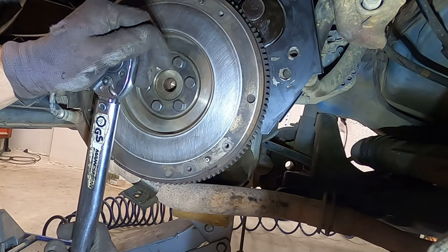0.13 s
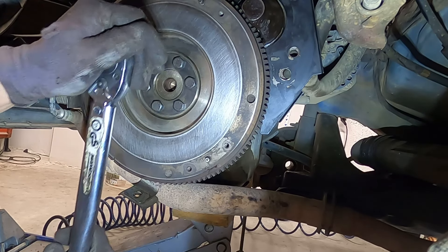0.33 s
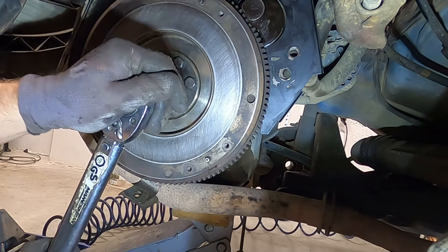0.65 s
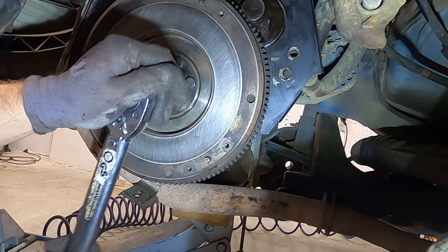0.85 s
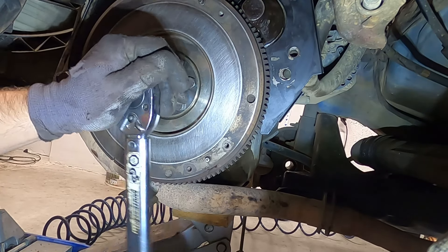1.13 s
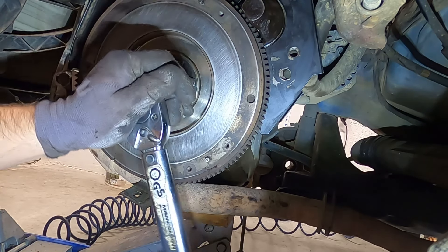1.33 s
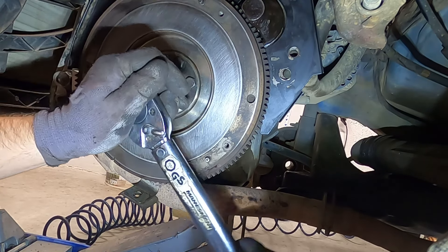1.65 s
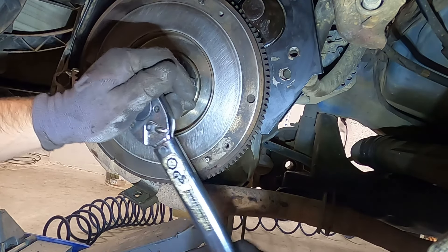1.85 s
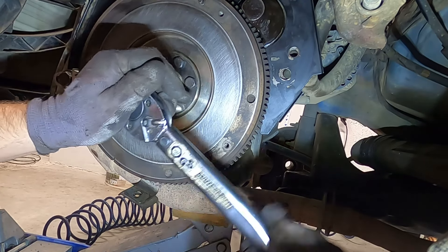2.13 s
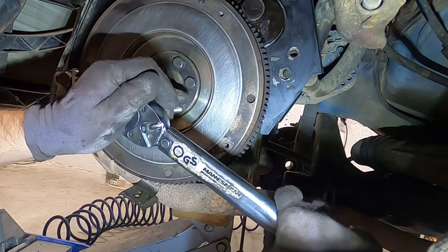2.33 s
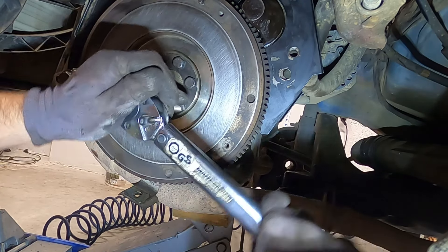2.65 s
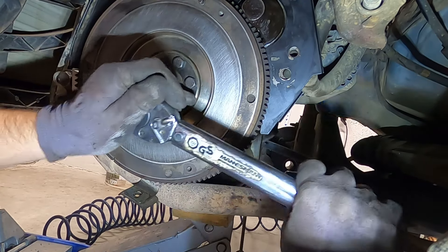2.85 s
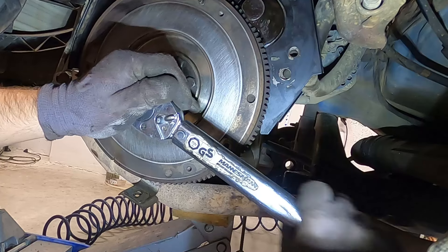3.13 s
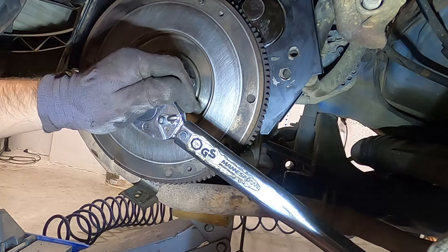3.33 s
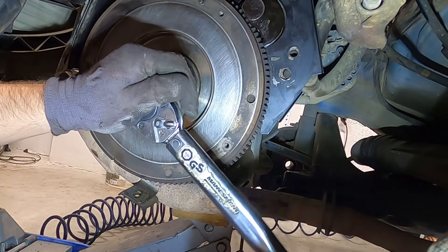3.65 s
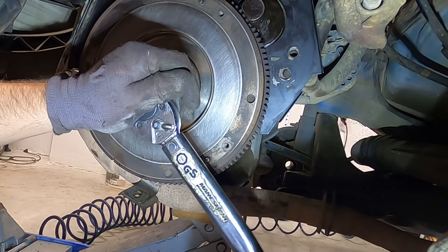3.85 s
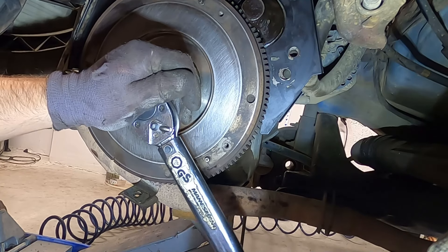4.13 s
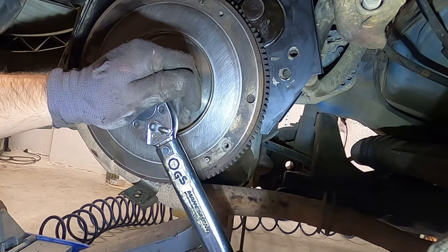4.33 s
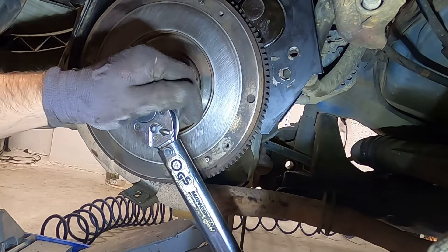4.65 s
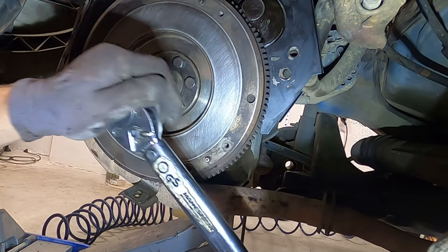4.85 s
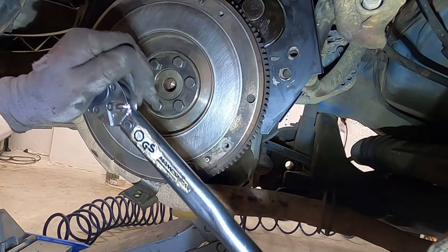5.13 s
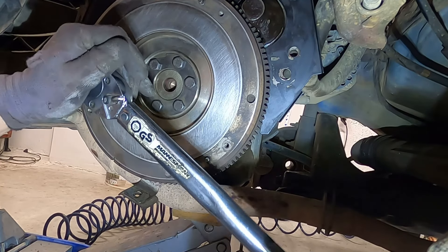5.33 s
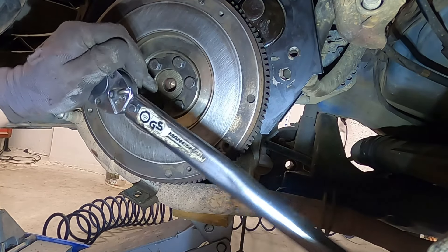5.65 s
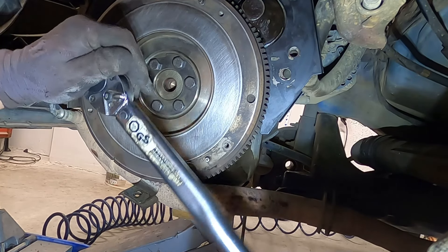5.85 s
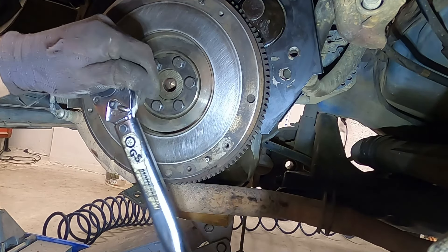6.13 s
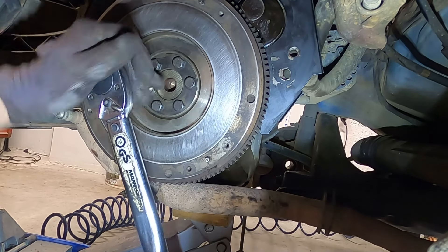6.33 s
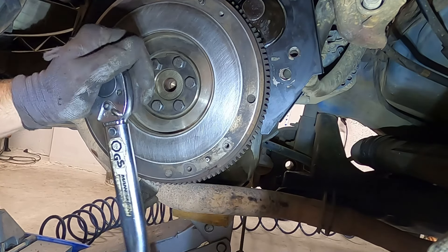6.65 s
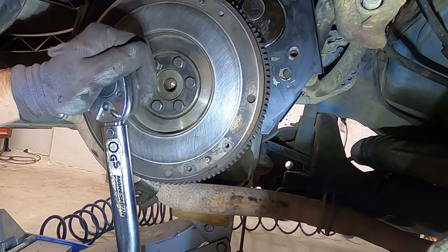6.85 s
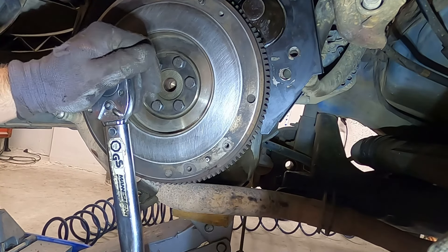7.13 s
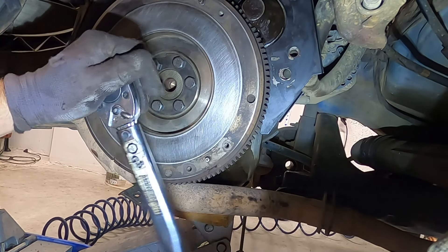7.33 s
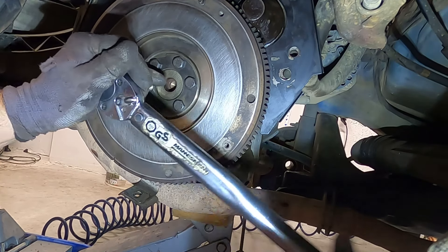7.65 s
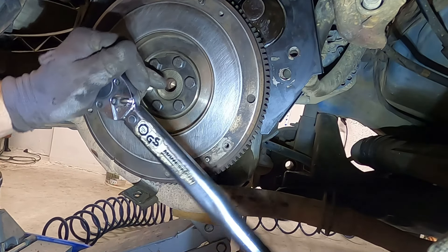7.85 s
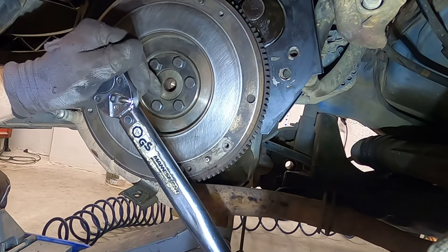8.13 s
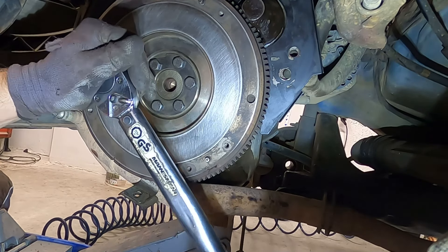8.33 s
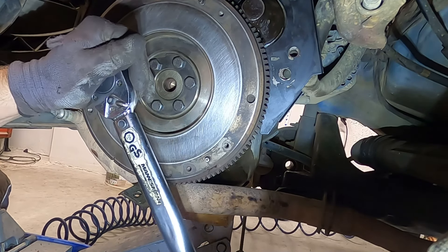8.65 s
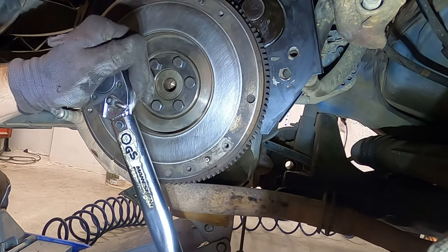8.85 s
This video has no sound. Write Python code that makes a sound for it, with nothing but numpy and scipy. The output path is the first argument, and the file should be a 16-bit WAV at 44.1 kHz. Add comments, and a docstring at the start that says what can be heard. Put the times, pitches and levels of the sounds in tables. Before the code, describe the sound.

Irregular metallic clinks on a flywheel, a single loud, deep wrench knock ringing through the engine, scattered sharp ratchet clicks and sleeve swishes in a quiet workshop.

```python
"""A garage, where flywheel bolts are tightened with a click-type torque wrench under a car.
Sockets clink, the wrench breaks over once with a heavy knock that rings through the engine, and its ratchet snaps
as it is swung back: each is a burst of filtered noise with decaying sines, sent through a diffuse noise echo.
Work clothes swish and a glove scuffs as streams of tiny clicks; squeaks are narrow-band noise, hand bumps dull
noise bursts, and the nudged camera mount and the quiet background are shaped noise."""
import sys
import numpy as np
from scipy import signal
from scipy.fft import rfft, irfft
from scipy.io import wavfile
from scipy.ndimage import uniform_filter1d

SR = 44100
rng = np.random.default_rng(int(sys.argv[2]) if len(sys.argv) > 2 else 0)


def waveform_to_disk(signal):
    """Save audio, clipped to [-1, 1], as 16-bit WAV at the path in sys.argv[1]."""
    frames = np.transpose(np.atleast_2d(signal))
    scaled = np.clip(frames, -1, 1) * 32767
    samples = np.round(scaled).astype(np.int16)
    wavfile.write(sys.argv[1], SR, samples)


N = 396900  # 9 s

# Low, quiet noise of the garage. Each row: frequency in Hz, relative density in dB.
BACKGROUND_COLOUR = [(30, -13.5), (90, -12.5), (170, 1), (350, -1.5), (600, -14.5), (900, -18.5),
                     (1700, -18), (4000, -19), (8000, -32.5), (15000, -30.5)]
# Slow wavering of that noise. Each row: time in seconds, level offset in dB.
BACKGROUND_SWELL = [(0, 10), (0.3, 4), (0.47, -3), (1.0, 4.5), (2.7, 4.5), (3.7, 6.5), (4.03, -6), (5.1, 9),
                    (6.0, -1.5), (7.3, 6.5), (8.3, 2), (9, -6.5)]
BACKGROUND_DB = -69.5  # rms level where the offset is 0 dB

# Jolts of the camera mount. Each row: start in seconds, level in dB before the layer's trim.
JOLTS = [(-0.06, -60), (2.91, -42), (4.39, -47.5), (4.73, -43.5), (6.36, -59), (6.95, -64), (8.18, -41),
         (8.37, -57.5)]
# Deep colour of the shaking mount. Each row: frequency in Hz, relative density in dB.
RUMBLE_COLOUR = [(20, 1.5), (45, -2), (80, -9), (160, -25.5), (500, -54.5)]
JOLT_ATTACK_S, JOLT_HOLD_S, JOLT_DECAY_DB_PER_S = 0.028, 0.036, 108

# Sleeve strokes over the work clothes, one for each move of the arm.
# Each row: fastest moment in seconds, level in dB before the layer's trim, swell in seconds, fade in seconds.
SWISH_STROKES = [(0.0, -67, .05, 0.29), (0.6, -68, 0.17, .17), (1.28, -46.5, 0.14, 0.23),
                 (1.85, -61, 0.51, 0.2), (2.4, -71, 0.34, 0.17), (2.85, -70, 0.29, .5),
                 (3.49, -52.5, 0.098, 0.092), (3.78, -51, 0.12, 0.15), (4.22, -63.5, 0.2, 0.93),
                 (5.07, -52.5, 0.17, 0.41), (5.5, -62, 0.31, 0.84), (6.03, -52, 0.074, 0.067),
                 (6.43, -50.5, 0.4, 0.13), (6.85, -42, .15, 0.12), (7.3, -45, 0.12, 0.19),
                 (7.55, -45.5, 0.091, 0.15), (7.77, -51.5, .12, 0.2), (7.92, -45, 0.055, 0.033),
                 (8.08, -51.5, 0.12, 0.33), (8.78, -61, 0.27, 0.73)]
# Bright hiss of the cloth. Each row: frequency in Hz, relative density in dB.
SWISH_COLOUR = [(200, -25.5), (400, -7), (750, -11.5), (1200, -5.5), (2000, 2), (2600, -1.5), (3700, 2),
                (5300, -6), (7000, -19), (9000, -24.5), (13500, -20.5), (15500, -33.5)]
# Glove strokes over the wrench head.
# Each row: fastest moment in seconds, level in dB before the layer's trim, swell in seconds, fade in seconds.
SCUFF_STROKES = [(0.0, -59, .05, 0.084), (1.34, -59, 0.03, 0.27), (3.36, -63.5, 0.24, 0.12),
                 (6.9, -40.5, .08, 0.062), (7.32, -50.5, 0.18, 0.14), (7.93, -56.5, 0.024, 0.05),
                 (8.19, -53.5, 0.06, 0.089)]
# Duller grain of the glove. Each row: frequency in Hz, relative density in dB.
SCUFF_COLOUR = [(150, -23), (430, -2), (650, -6), (900, -0.5), (1300, -8.5), (1800, 2), (2600, -12),
                (5000, -35.5)]
STROKE_DROP_DB = 10.5  # fall of a stroke over one swell or fade time

# Brief, thin squeaks. Each row: start in seconds, peak level in dB, frequency in Hz, slip length in seconds.
SQUEAKS = [(0.444, -42, 1860, 0.052), (4.831, -33, 1130, 0.014), (6.13, -38.5, 1140, 0.0056),
           (7.482, -28.5, 3050, 0.01), (8.161, -34, 1210, 0.013)]

# The socket strikes bolt heads and flywheel.
# Each row: start in seconds, strength in dB, bass in dB, brightness in dB, ring of the body in dB (all relative).
CLINKS = [(0.892, 12.5, -3.5, -11, -2.5), (1.015, 8.5, -15, -14.5, 4), (1.044, 8, 3, -12, -2),
          (1.115, 5, -1, -6.5, -13), (1.288, -23.5, 21, -7, 15.5), (1.433, 3.5, -6, -2, -3),
          (1.449, 8, -10, -1, -23), (1.467, 14.5, -4, -3.5, -16), (1.487, 17.5, -7, 1, -13.5),
          (1.494, 12, 10, -1, -7.5), (1.55, -6, 23.5, -13, 3), (1.689, -5.5, 6.5, -9, -2),
          (1.734, 13.5, 6, 3, -13), (1.745, 7, 11, -12, 1), (1.777, 19.5, -5.5, 1.5, -16),
          (1.784, 16.5, 4, 1, -19.5), (2.018, -10, 1, -6.5, -6), (2.124, -11, 16, -12, -5),
          (2.604, -7.5, 4, -1, -6), (4.958, -2, -27, -4.5, -13), (5.309, 13.5, -3, -10, -1.5),
          (5.376, -7.5, 14, -10, 4.5), (5.428, 8.5, 3, -21, 3), (5.482, 13.5, -7.5, -2.5, -12),
          (5.767, -7.5, -10, -8, -27), (6.205, 20, -6.5, 0.5, -2.5), (6.68, -8.5, -24, 3.5, -17),
          (8.089, -0.5, 2, -16, -11), (8.142, -4, -7, -12, -10), (8.204, -0.5, 12, 3, -3.5)]
# Colour of the socket's contact. Each row: frequency in Hz, relative level in dB.
CLINK_COLOUR = [(30, -50), (120, -34), (250, -22.5), (520, -8.5), (800, -7.5), (1200, -1), (1700, -1.5),
                (2150, 2), (2650, -8.5), (3300, -0.5), (4200, -9.5), (5300, -14.5), (7000, -33.5),
                (15000, -39)]
# Ringing parts of the flywheel. Each row: frequency in Hz, relative level in dB, T60 in seconds.
FLYWHEEL_MODES = [(174, -18.5, 0.51), (433.5, -10.5, 0.2), (488, -4, 0.37), (577.5, -1, 0.32),
                  (592, -7, 0.37), (1007, -7.5, 0.19), (1184, -1.5, 0.15), (1570, -3, 0.16),
                  (1602, 8, 0.17), (1776, 4.5, 0.12), (1890, 5, 0.22), (2350, -6.5, 0.17), (3400, -7, .18),
                  (3340, -2.5, 0.22), (3450, -8, 0.2), (3940, -15.5, 0.45), (5360, -3, 0.133)]
# The loose socket ticks while it is worked onto a bolt.
# Each row: the two limits of a fumble in seconds, in either order.
FUMBLES = [(1.031, 1.9), (1.42, 1.7), (1.9, 2.52), (2.55, 2.66), (5.329, 4.9)]
TICK_DB, TICK_SPREAD_DB = -19, 3  # strength and its random scatter
TICK_BASS_DB, TICK_BRIGHT_DB, TICK_RING_DB = 5, -9, -6  # dull, light touches
SHARPNESS_DB = -1  # sharpness relative to brightness
CONTACT_T60_S = 0.024  # at 0 dB strength and brightness
CONTACT_DOUBLES_DB, CONTACT_HALVES_DB = 26, 25  # strength that doubles it, brightness that halves it

# The wrench's release slips, breaks over and rebounds. Each row: start in seconds, strength in dB, bass in dB,
# brightness in dB, sharpness in dB, T60 of the contact in seconds, ring of the body in dB (levels relative).
KNOCK = [(2.901, 1.9, -15.5, 7, 2, 0.077, -5.5), (2.912, 11, -8.5, 5.5, 5, 0.081, -7),
         (2.923, 13.6, -8, 7, 3.5, 0.02, -7.5), (2.929, 20, -1, -3, -5, 0.057, 6),
         (2.939, 13, -3, -1, 1.5, 0.021, -4), (2.945, 18, -1.5, -13.5, -11.5, 0.035, -1.5),
         (2.98, 8.7, -2, -19, -5, 0.042, -5.5), (2.996, 10, 1, -40, -4.5, 0.16, -3),
         (3.048, 6.3, -4, -8, -8, 0.37, -10)]
# Colour of the release's contact. Each row: frequency in Hz, relative level in dB.
KNOCK_COLOUR = [(50, -2.5), (100, 4.5), (350, 1), (680, -8), (1050, 1), (1400, -0.5), (1850, 6),
                (2500, -6.5), (3200, 7), (3850, 0), (4400, -15), (6200, -23), (8000, -37), (15000, -33)]
# Ringing parts of the engine. Each row: frequency in Hz, relative level in dB, T60 in seconds.
ENGINE_MODES = [(80, -18.5, 1), (85, -14, 0.87), (102, -21.5, 0.63), (167, -25, 0.4), (217, -25.5, .35),
                (291, -17, 0.29), (384, -19, 0.27), (460, -22, 0.14), (515, -22, 0.32), (892, -21, .35),
                (1077, -20, 0.19), (1172, -28.5, .35), (1470, -32.5, 0.44), (1517, -18.5, 0.39),
                (1620, -22.5, .3), (1690, -18, 0.37), (1790, -21.5, .35), (1805, -15, 0.48),
                (1800, -25.5, 0.39), (2020, -27, .35), (2260, -32, .4), (2812, -18.5, .36),
                (2855, -24, .36), (3132, -21, 0.37), (3057, -25, 0.33), (3120, -21.5, .34),
                (3405, -26, .34), (3764, -26.5, 0.35), (3880, -28, .38)]

# Ratchet pawl and handle joint. Each row: start in seconds, strength in dB, bass in dB,
# brightness in dB, sharpness in dB, T60 of the contact in seconds, ring of the body in dB (levels relative).
SNAPS = [(4.407, 16, -0.5, 3, -5, 0.022, 0.5), (4.416, 5, 12.5, 11, -7.5, 0.24, -1),
         (4.735, 20, -8, -8.5, -11, 0.047, -3), (5.311, 0, 12.5, -16, -20, .03, -4),
         (6.207, 2, 4.5, 12.5, -27, 0.023, 4.5), (7.569, 7.5, -36, -5, -4.5, 0.053, -28),
         (7.588, 16.5, -13.5, -7, -10, 0.015, -34), (7.694, 3, -28, -2.5, -4, 0.098, -24),
         (7.712, 14.5, -15.5, -7.5, -8, 0.028, -33)]
# Colour of the snapping contact. Each row: frequency in Hz, relative level in dB.
SNAP_COLOUR = [(100, -32), (350, -13), (650, -14.5), (900, -7), (1300, -7.5), (1800, 2.5), (2350, 5),
               (3100, -2), (4500, 8.5), (6200, -5), (8000, -14.5), (11500, -16), (13600, -1.5),
               (15500, -20)]
# Ringing parts of the wrench. Each row: frequency in Hz, relative level in dB, T60 in seconds.
WRENCH_MODES = [(166.2, 8.5, 0.25), (205.6, -2, 0.55), (374.7, 10, 0.13), (434.7, 8.5, 0.22),
                (476, -11.5, 0.11), (850, 4.5, 0.17), (1739, -19, 0.15), (2350, -9, 0.086), (2900, -9, .2),
                (3060, 10, 0.25), (3500, 0, .18), (3750, -2.5, 0.22), (4168, 7, 0.26), (4500, -13, 0.16),
                (4800, -7, 0.084)]

# Soft bumps of the hand. Each row: start in seconds, strength in dB, T60 in seconds.
BUMPS = [(7.13, 3, 0.3), (7.15, 0, 0.094), (7.173, -7, 0.096), (8.221, -2, 0.35), (8.569, -16.5, 0.26)]
# Dull colour of the bumps. Each row: frequency in Hz, level in dB.
BUMP_COLOUR = [(30, -39), (90, 3), (180, 0), (330, 1.5), (650, -15.5), (1200, -1), (2200, -32), (6000, -33),
               (15000, -70)]

# Echo of the garage. Each row: frequency in Hz, echo level in dB.
ECHO = [(60, -8.5), (170, -2), (400, 2.5), (800, -7), (1800, -9.5), (3500, -12), (6000, -4.5),
        (13000, -6.5)]
# Decay of that echo. Each row: frequency in Hz, T60 in seconds.
ECHO_T60 = [(80, 0.57), (260, 0.39), (700, 0.31), (1800, 0.29), (4000, 0.27), (13000, 0.067)]

PORT_NOTCH_HZ, CUTOFF_HZ = 8190, 15900


def from_db(db):
    """Turn decibels into gain."""
    return 10 ** (np.asarray(db) / 20)


def at_hz(points, hz):
    """Read a curve of frequency and value on a log-frequency axis."""
    points = np.array(points, float)
    return np.interp(np.log(np.maximum(hz, 1)), np.log(points[:, 0]), points[:, 1])


def coloured(x, spectrum):
    """Shape a full-length sound by a spectrum and bring it to rms 1."""
    gain = from_db(at_hz(spectrum, np.fft.rfftfreq(N, 1 / SR)))
    y = irfft(rfft(x) * gain, N)
    return y / y.std()


def dying(t, t60):
    """Fade exponentially, by 60 dB in t60 seconds."""
    return np.exp(-np.log(1000) * t / t60)


def add(out, s, sound):
    """Mix a sound in at s seconds."""
    start = int(round(s * SR))
    out[start:start + len(sound)] += sound[:N - start]


def background():
    """The quiet, dull noise of the garage: shaped noise with a slowly wavering level."""
    swell_db = np.interp(np.arange(N) / SR, *np.transpose(BACKGROUND_SWELL))
    return from_db(BACKGROUND_DB + swell_db) * coloured(rng.standard_normal(N), BACKGROUND_COLOUR)


def mount_rumble(gain_db):
    """Each jolt sets the camera mount shaking: a quick swell, a short hold and a steady decay."""
    t, shake = np.arange(N) / SR, np.zeros(N)
    for s, db in JOLTS:
        attack = np.clip((t - s) / JOLT_ATTACK_S, 0, 1)
        decay_time = np.maximum(t - s - JOLT_ATTACK_S - JOLT_HOLD_S, 0)
        shake += attack * from_db(db - JOLT_DECAY_DB_PER_S * decay_time)
    return from_db(gain_db) * shake * coloured(rng.standard_normal(N), RUMBLE_COLOUR)


def strokes(rows):
    """The hand speeds up and slows down: bells of friction, adding in power where they overlap."""
    t, power = np.arange(N) / SR, np.zeros(N)
    for s, db, swell_s, fade_s in rows:
        away = (t - s) / np.where(t < s, swell_s, fade_s)
        near = np.abs(away) < 4
        power[near] += from_db(db - STROKE_DROP_DB * away[near] ** 2) ** 2
    return np.sqrt(power)


def rubbing(rows, colour, gain_db, slips_per_s, spread_db, judder_db):
    """Fibres catch and slip: many tiny clicks of uneven size, swayed by the judder of the stroke."""
    size_db = spread_db * np.minimum(rng.exponential(1, N), 4)
    sizes = from_db(size_db) * rng.standard_normal(N)
    slipping = rng.random(N) < slips_per_s / SR
    judder = uniform_filter1d(rng.standard_normal(N), size=400)
    slips = sizes * slipping * from_db(judder_db * judder / judder.std())
    return from_db(gain_db) * strokes(rows) * coloured(slips, colour)


def cloth_swish():
    """The sleeve slides over the work clothes: a dense, bright stream of fibre slips."""
    return rubbing(SWISH_STROKES, SWISH_COLOUR, gain_db=2.5, slips_per_s=22000, spread_db=-1.0, judder_db=0.5)


def glove_scuff():
    """The glove drags over the wrench head: sparser and duller slips."""
    return rubbing(SCUFF_STROKES, SCUFF_COLOUR, gain_db=2.5, slips_per_s=3200, spread_db=-2.5, judder_db=-0.5)


def squeaks(width):
    """A short noisy slip drives one narrow resonance; width is half its band as a log frequency ratio."""
    out = np.zeros(N)
    for s, db, hz, length in SQUEAKS:
        count = int(length * SR)
        slip = np.pad(rng.standard_normal(count) * np.hanning(count), (0, count))
        edges = hz * np.exp(width * np.array([-1, 1]))
        tone = signal.sosfilt(signal.butter(2, edges, "band", fs=SR, output="sos"), slip)
        add(out, s, from_db(db) * tone / np.abs(tone).max())
    return out


def causal_filter(x, gain_db):
    """Filter with minimum phase, so that nothing sounds before the blow."""
    cepstrum = irfft(np.log(from_db(gain_db)))
    cepstrum[1:len(x) // 2] *= 2
    cepstrum[len(x) // 2 + 1:] = 0
    return irfft(rfft(x) * np.exp(rfft(cepstrum)))


def contact(t60, colour_db, crack, rise_s, size=16384):
    """A first crack and a dense chatter of the touching parts that builds quickly and dies."""
    t = np.arange(size) / SR
    chatter = rng.standard_normal(size) * dying(t, t60) * (1 - np.exp(-t / rise_s))
    chatter /= np.linalg.norm(chatter)
    chatter[0] += crack
    # level out the broad spectrum before colouring; the fine structure stays random
    broad = uniform_filter1d(np.abs(rfft(chatter)) ** 2, size=241, mode="reflect")
    return causal_filter(chatter, colour_db(np.fft.rfftfreq(size, 1 / SR)) - 10 * np.log10(broad))


def tint(hz, bass_db, bright_db, sharp_db):
    """Where and how hard a blow lands weights the bass, the upper modes and the top."""
    # the middle is left all but level
    curve = [(550, bass_db), (1100, 0.0033), (2400, 0.00053),
             (3100, bright_db), (3900, bright_db), (4800, sharp_db)]
    return at_hz(curve, hz)


def ringing(modes, t, detune, bloom_cycles, blur_hz, size=32):
    """Decaying sines: the grip shifts pitches from blow to blow, and low modes swell more slowly."""
    hz, _, t60 = np.transpose(modes)[:, :, None]
    pitch = hz * (1 + detune * rng.standard_normal(hz.shape))
    # a random drift of phase blurs every line, so that the rings sound rougher
    step_size = np.sqrt(2 * np.pi * blur_hz * size / SR)
    steps = step_size * rng.standard_normal((len(hz), len(t) // size + 1))
    drift = np.repeat(np.cumsum(steps, axis=1), size, axis=1)[:, :len(t)]
    phase = 2 * np.pi * pitch * t + uniform_filter1d(drift, size=320)
    swell = 1 - np.exp(-t * hz / bloom_cycles)
    return np.sin(phase) * swell * dying(t, t60)


def blows(rows, colour, modes, gain_db, ring_db, crack, rise_s, scatter_db, detune, bloom_cycles, blur_hz):
    """Steel on steel: each contact is short and leaves the body's modes ringing."""
    out, t = np.zeros(N), np.arange(int(0.8 * SR)) / SR
    mode_hz, mode_db, _ = np.transpose(modes)
    for s, db, bass_db, bright_db, sharp_db, t60, body_db in rows:
        hit = contact(t60, lambda hz: at_hz(colour, hz) + tint(hz, bass_db, bright_db, sharp_db), crack, rise_s)
        add(out, s, from_db(db + gain_db) * hit)
        # the modes take on half the tint of the blow, each with a random share of its own
        mode_tint = 0.5 * tint(mode_hz, bass_db, bright_db, sharp_db)
        shares_db = mode_db + mode_tint + scatter_db * rng.standard_normal(len(modes))
        ring = ringing(modes, t, detune, bloom_cycles, blur_hz)
        add(out, s, from_db(db + body_db + ring_db + shares_db) @ ring)
    return out


def ticks(count=3):
    """Faint touches of the loose socket, one at a random moment in each equal part of a fumble."""
    rows = []
    for limit, other_limit in FUMBLES:
        for k in range(count):
            s = limit + (k + rng.random()) / count * (other_limit - limit)
            db = TICK_DB + TICK_SPREAD_DB * rng.standard_normal()
            rows.append((s, db, TICK_BASS_DB, TICK_BRIGHT_DB, TICK_RING_DB))
    return rows


def socket_blows(rows):
    """Heavy contacts chatter longer; hard ones, heard as bright, are sharper and shorter."""
    full_rows = []
    for s, db, bass_db, bright_db, ring_db in rows:
        t60 = CONTACT_T60_S * 2 ** (db / CONTACT_DOUBLES_DB - bright_db / CONTACT_HALVES_DB)
        full_rows.append((s, db, bass_db, bright_db, bright_db + SHARPNESS_DB, t60, ring_db))
    return full_rows


def socket_clinks():
    """The socket strikes or ticks on bolt heads and flywheel, and the flywheel's modes ring."""
    return blows(socket_blows(CLINKS + ticks()), CLINK_COLOUR, FLYWHEEL_MODES,
                 gain_db=-2.0, ring_db=-51.5, crack=0.15, rise_s=0.0025,
                 scatter_db=3.5, detune=0.012, bloom_cycles=1.7, blur_hz=29.5)


def release_knock():
    """The wrench breaks over in a cluster of heavy contacts that ring through the engine."""
    return blows(KNOCK, KNOCK_COLOUR, ENGINE_MODES,
                 gain_db=2.0, ring_db=-37.5, crack=0.036, rise_s=0.002,
                 scatter_db=4.0, detune=0.0019, bloom_cycles=1.5, blur_hz=10.0)


def ratchet_snaps():
    """The ratchet pawl and handle joint snap, and the wrench's modes ring."""
    return blows(SNAPS, SNAP_COLOUR, WRENCH_MODES,
                 gain_db=-2.5, ring_db=-56.5, crack=0.077, rise_s=0.00068,
                 scatter_db=2.5, detune=0.0121, bloom_cycles=3.9, blur_hz=29.0)


def bumps():
    """The gloved hand lands softly: dull thuds without a ring."""
    out = np.zeros(N)
    for s, db, t60 in BUMPS:
        thud = contact(t60, lambda hz: at_hz(BUMP_COLOUR, hz), crack=0, rise_s=0.0007)
        add(out, s, from_db(db) * thud)
    return out


def garage(x, first_echo_s, build_s):
    """Diffuse echoes build up after a short gap and die sooner in the treble."""
    t = np.arange(SR) / SR
    hz, white = np.fft.rfftfreq(SR, 1 / SR), rfft(rng.standard_normal(SR))
    edges, response = np.geomspace(25, 18000, 20), np.zeros(SR)
    for low, high in zip(edges, edges[1:]):
        centre = np.sqrt(low * high)
        shape = np.clip((t - first_echo_s) / build_s, 0, 1) * dying(t, at_hz(ECHO_T60, centre))
        band = irfft(white * (hz >= low) * (hz < high), SR) * shape
        # energy in proportion to bandwidth, then the echo level
        level = np.sqrt(2 * (high - low) / SR) * from_db(at_hz(ECHO, centre))
        response += band / np.linalg.norm(band) * level
    return signal.fftconvolve(x, response)[:N]


def scene():
    """Steel blows with the garage's echo, over dry cloth, hand, mount and background layers."""
    bed = background() + mount_rumble(gain_db=-5.0)
    friction = cloth_swish() + glove_scuff()
    work = socket_clinks() + release_knock() + ratchet_snaps()
    hand = squeaks(width=0.11) + bumps()  # soft and close, so left without echo
    echo = garage(work, first_echo_s=0.0054, build_s=0.0057)
    return (bed + friction + hand + work + echo)[None]


def record(dry):
    """The microphone port cancels one narrow treble band; the highest peaks are rounded and the top is cut."""
    notched = signal.lfilter(*signal.iirnotch(PORT_NOTCH_HZ, 9.0, fs=SR), dry)
    rounded = notched / (1 + (notched / 0.85) ** 8) ** (1 / 8)
    top_cut = signal.ellip(10, 0.1, 80, CUTOFF_HZ, fs=SR, output="sos")
    return signal.sosfilt(top_cut, rounded)


dry = scene()
out = record(dry)
waveform_to_disk(out)
```